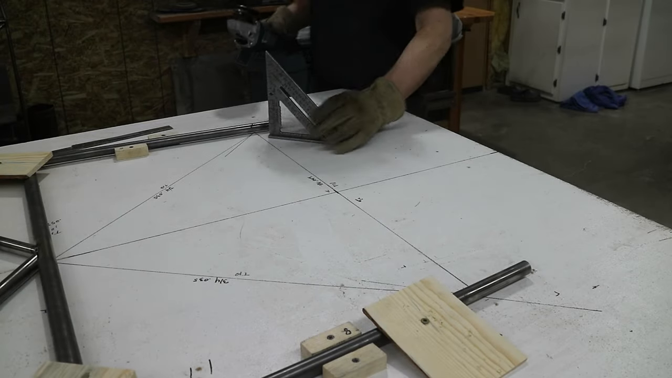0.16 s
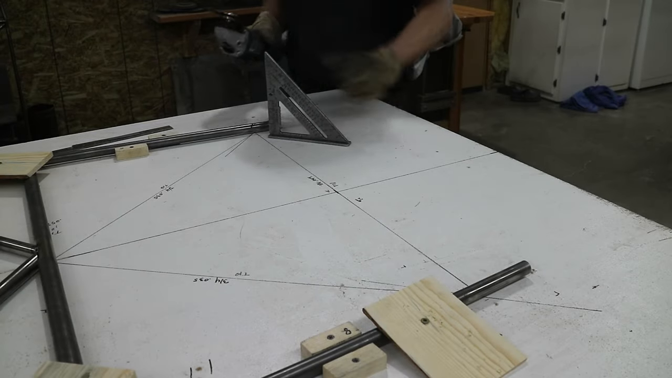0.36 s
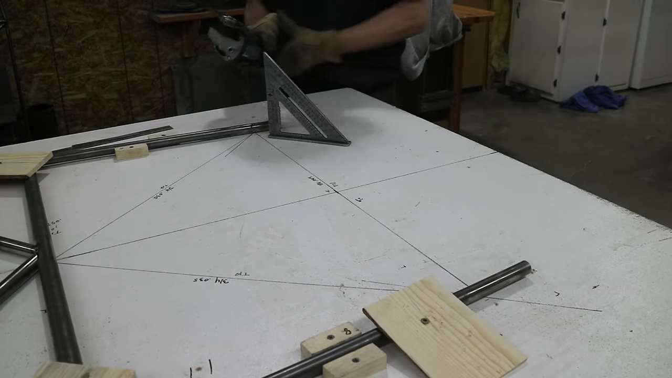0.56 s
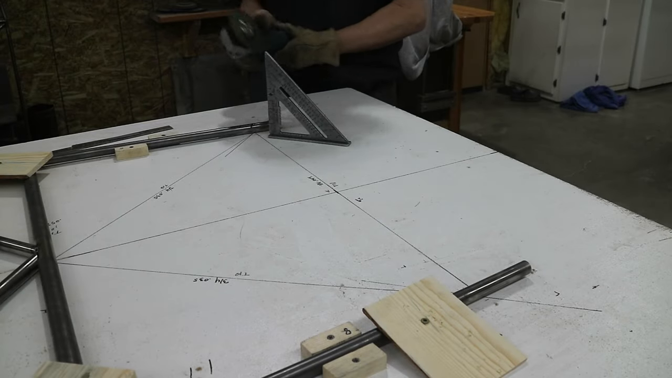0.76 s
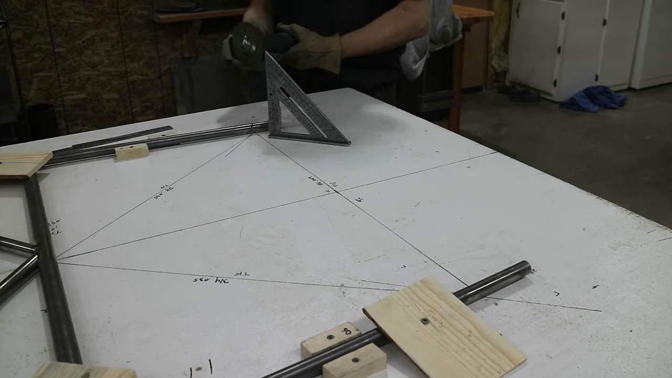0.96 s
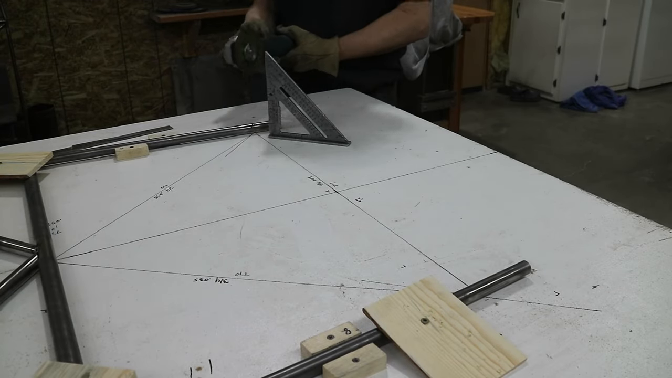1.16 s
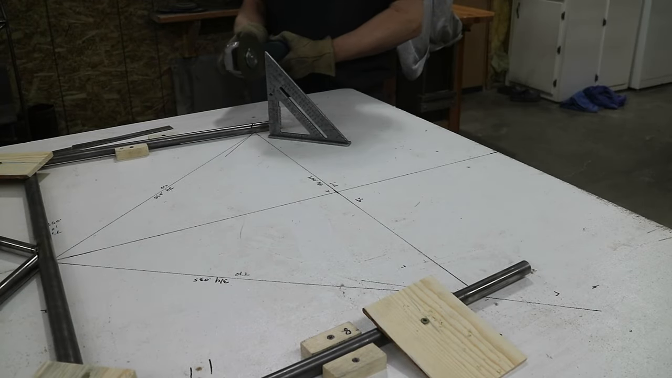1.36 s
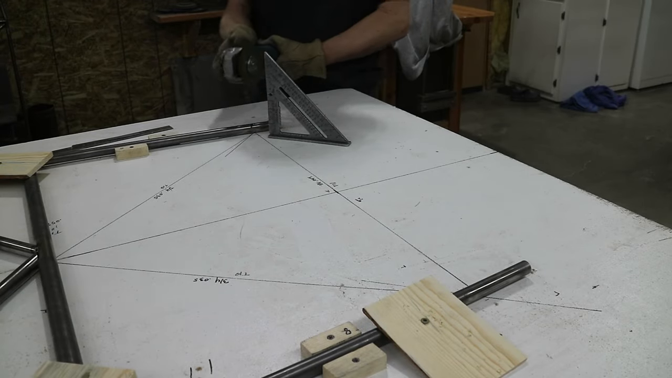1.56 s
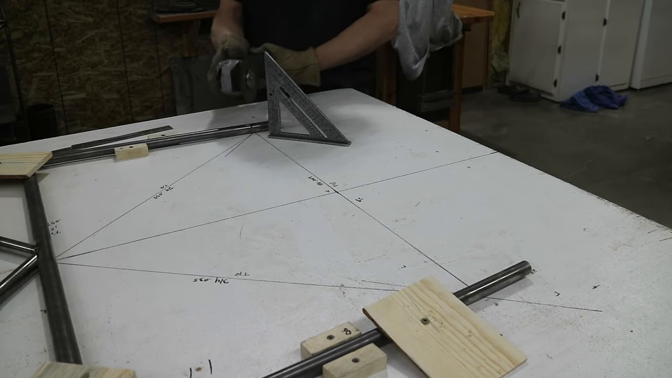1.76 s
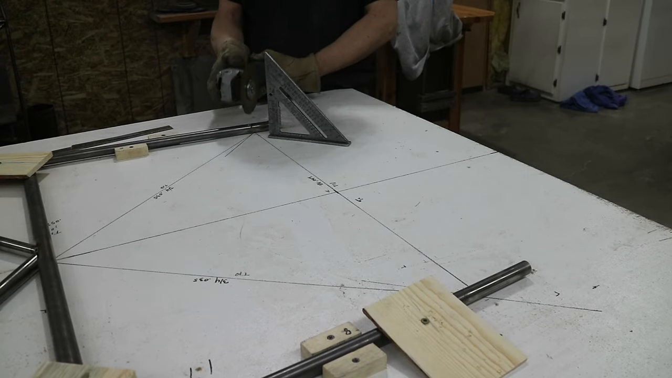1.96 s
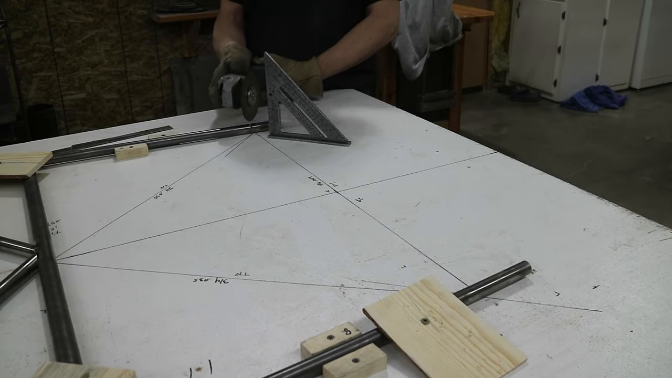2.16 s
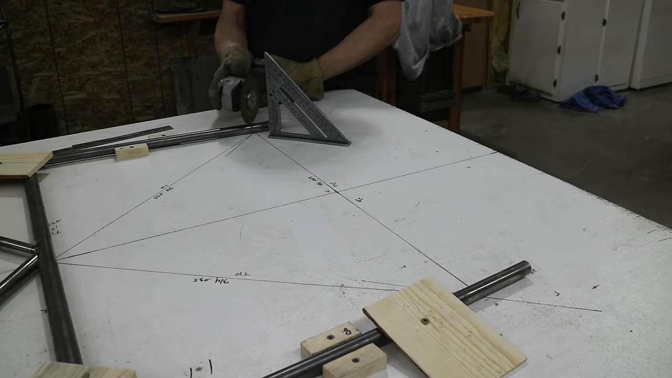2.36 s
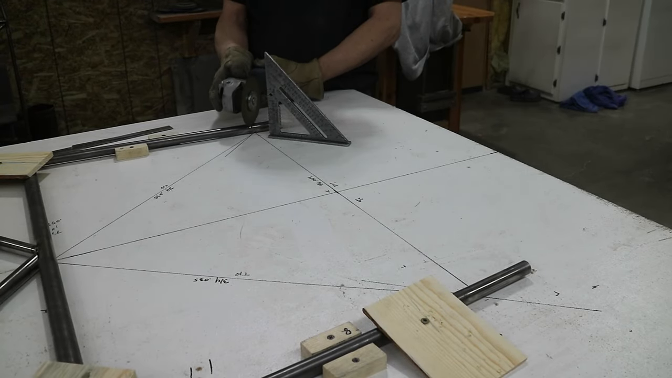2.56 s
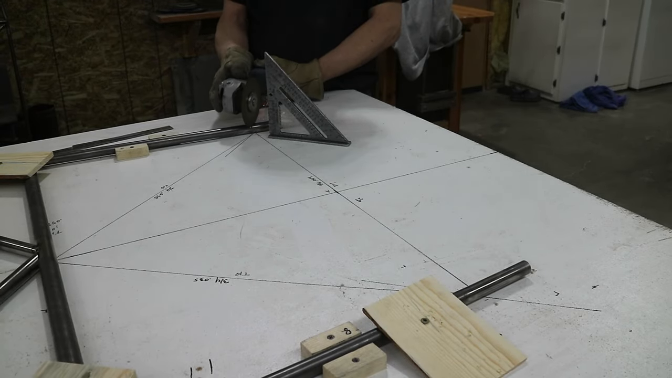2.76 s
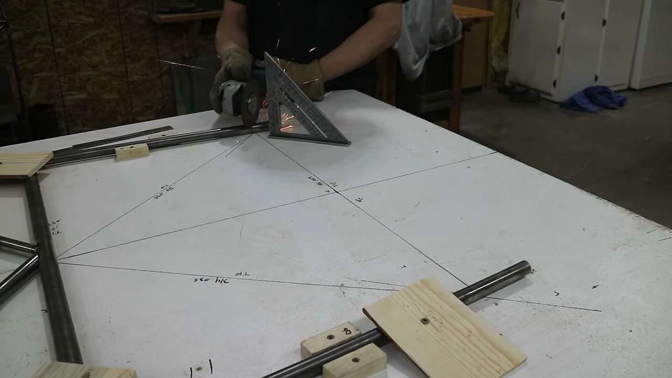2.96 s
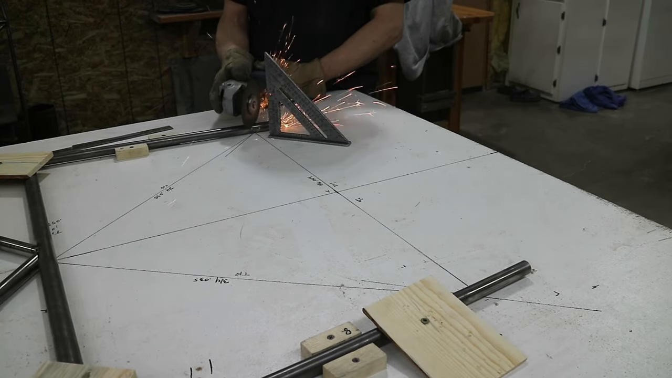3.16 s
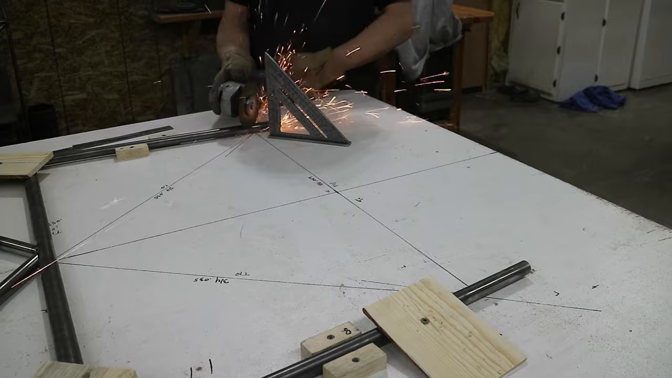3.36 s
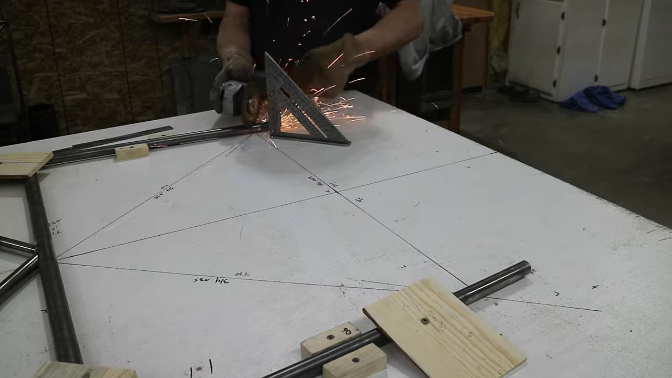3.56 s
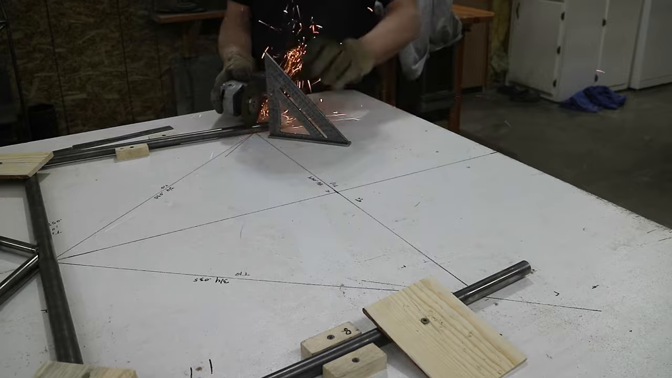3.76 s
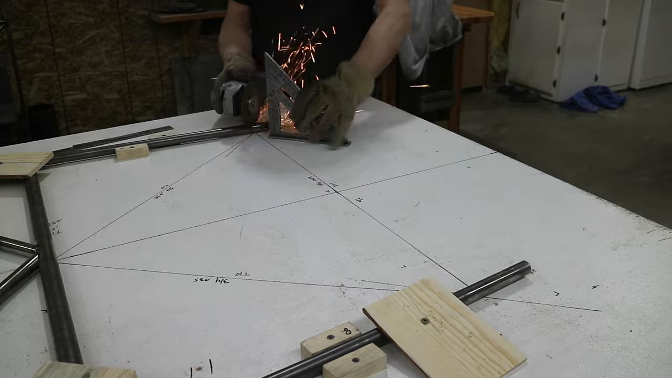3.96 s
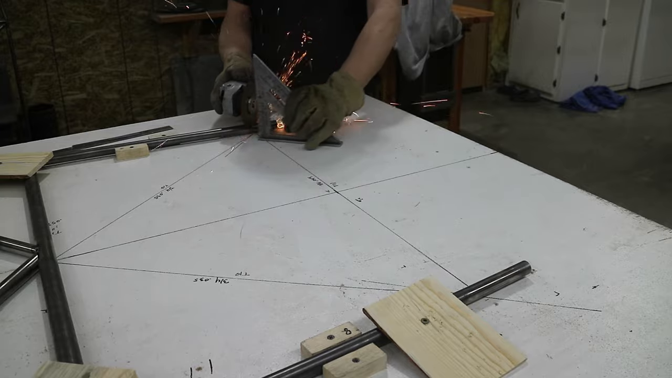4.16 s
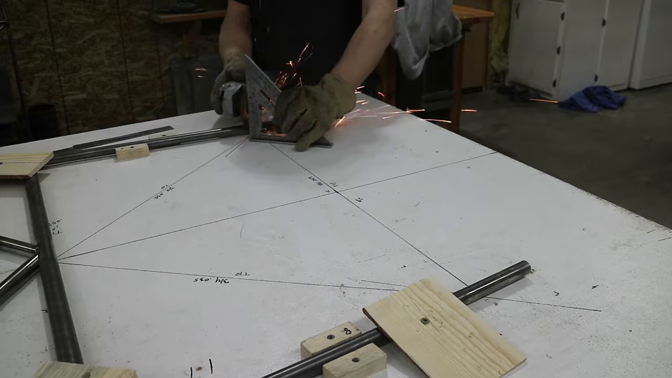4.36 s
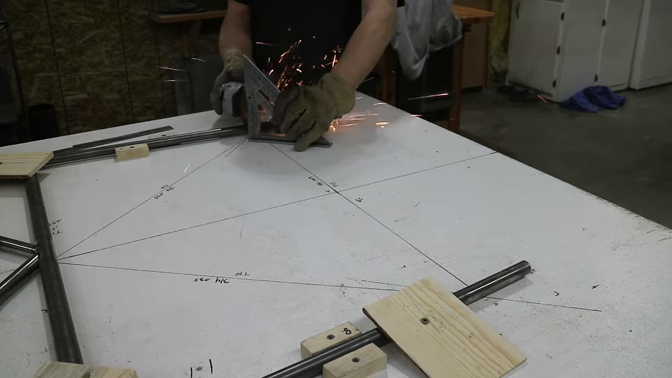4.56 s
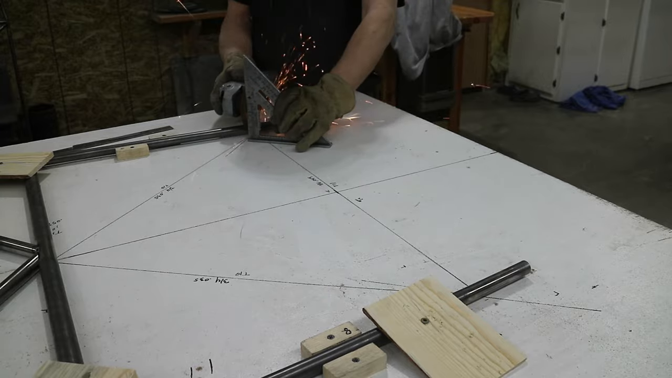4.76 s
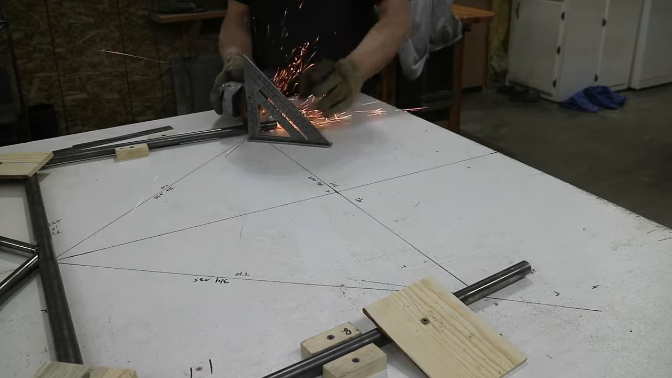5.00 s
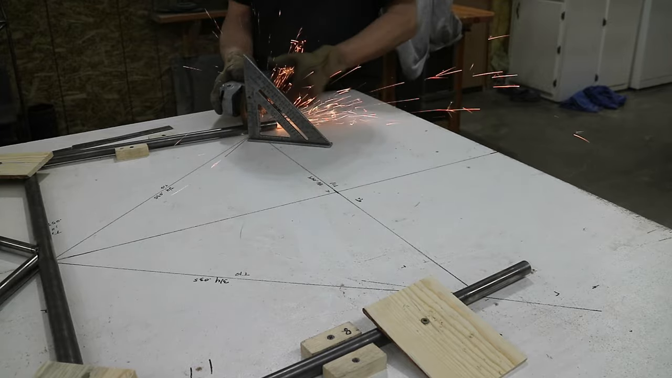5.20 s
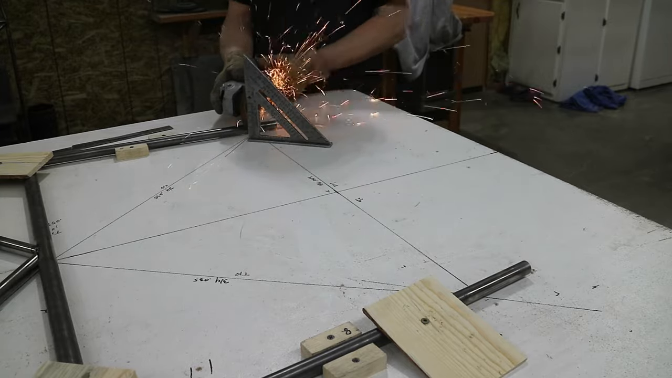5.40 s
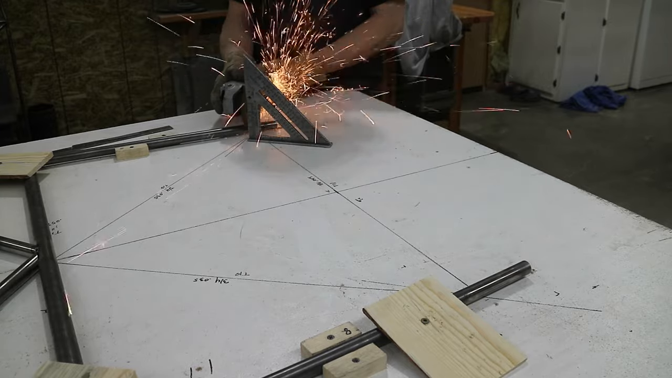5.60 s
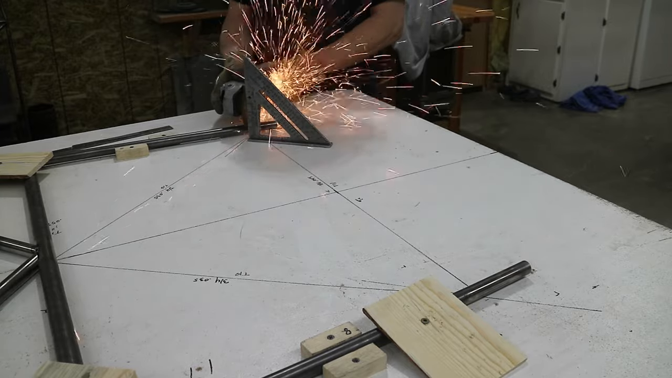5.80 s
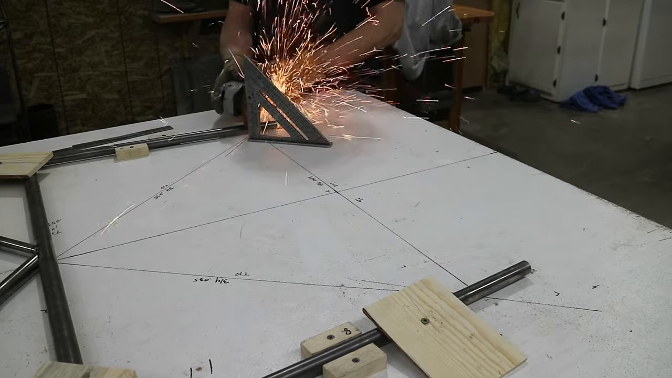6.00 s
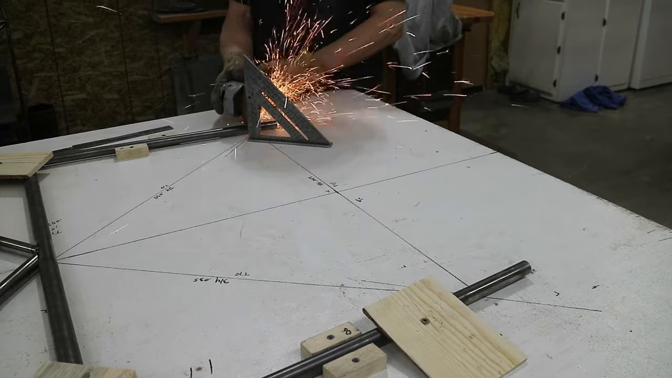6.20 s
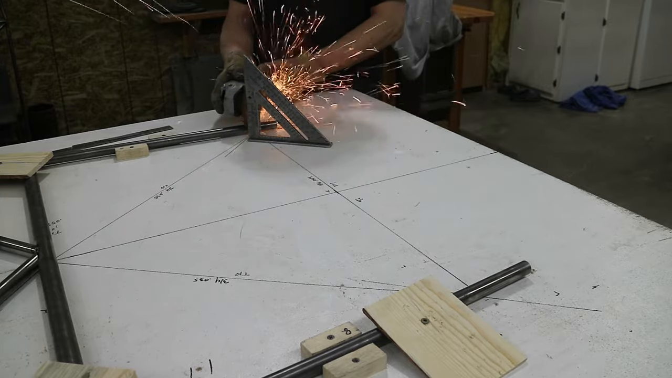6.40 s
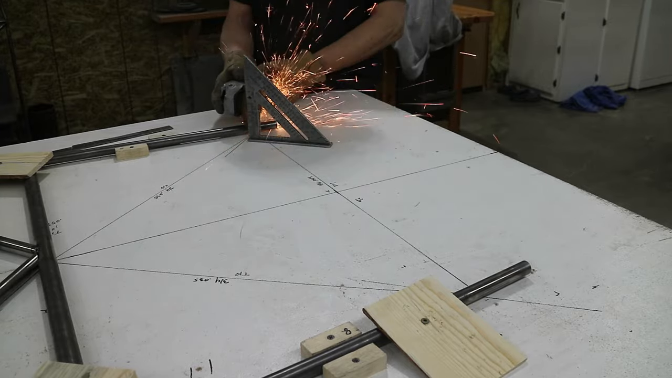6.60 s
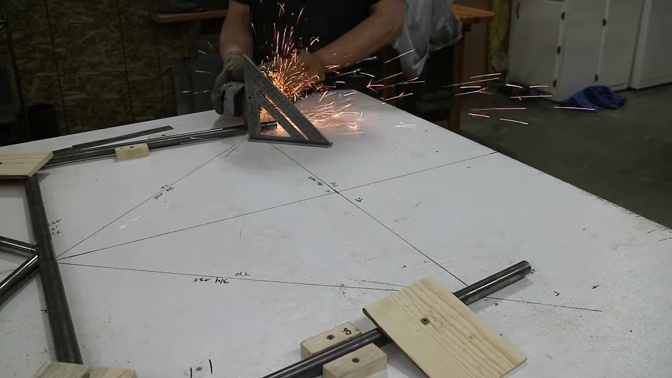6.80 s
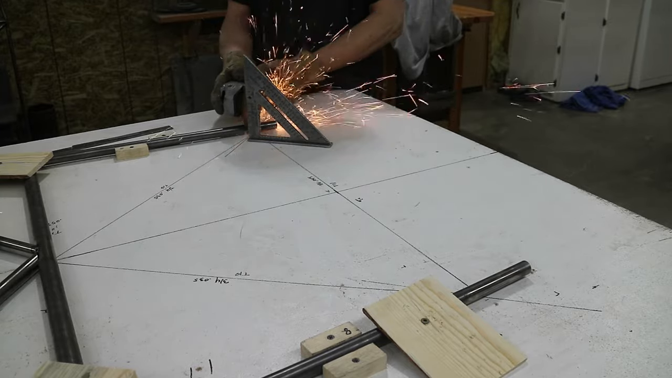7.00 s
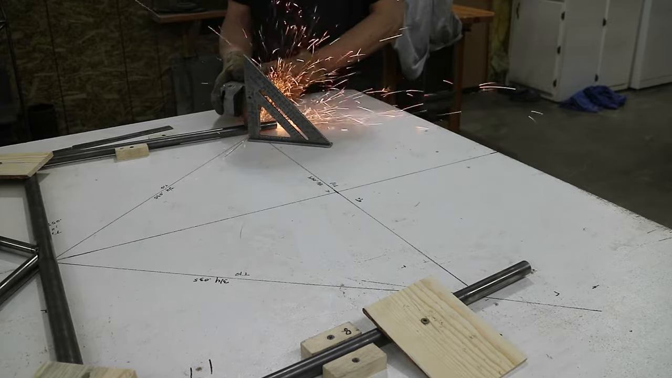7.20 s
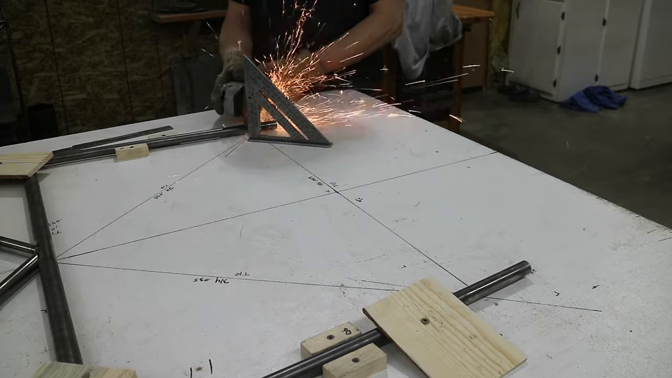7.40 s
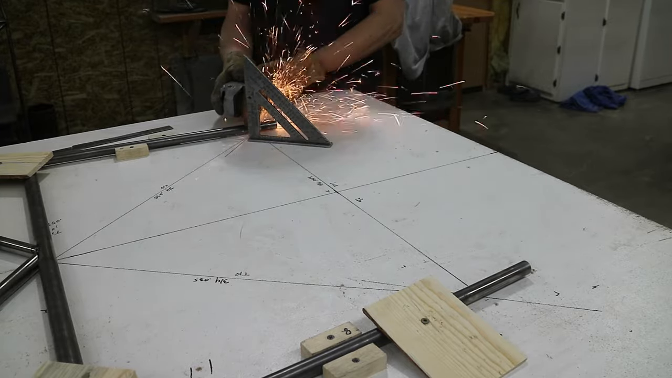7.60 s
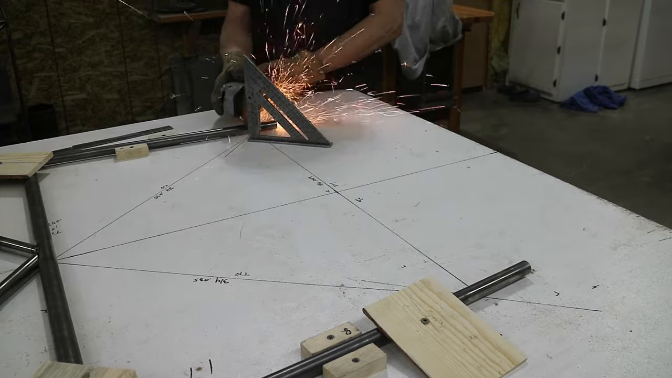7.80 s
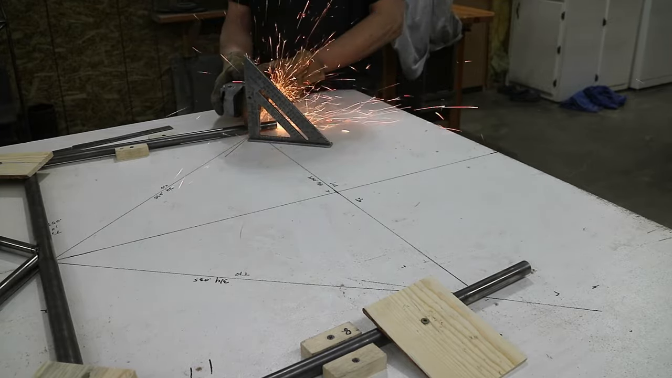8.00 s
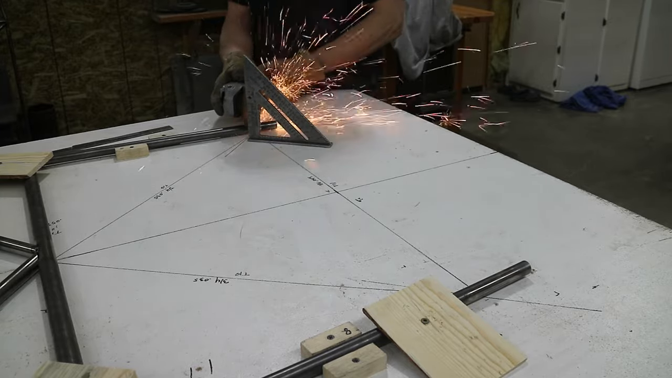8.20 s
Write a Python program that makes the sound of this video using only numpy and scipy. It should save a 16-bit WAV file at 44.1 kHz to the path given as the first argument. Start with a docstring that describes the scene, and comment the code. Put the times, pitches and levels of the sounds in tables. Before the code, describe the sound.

In a home workshop, a bench knock dies away under soft glove and sleeve rustling, with tiny tool clicks. An angle grinder jolts on, gears rattling and rotor whining upward over rushing fan air. About a second later the disc bites into steel tube: a loud, gritty, ringing scrape with bright spark hiss and shifting squeals, continuing to the end. Stereo microphone a few steps away, with slight room reverberation.

```python
"""A knock on a workshop bench dies away, gloves and sleeves brush, tools click, then an angle grinder jolts on.
Noise coloured by spectra makes bench, cloth, gear rattle and cooling air; sines make the slot whine and rotor tone.
The disc then bites into a steel tube: its uneven rim repeats a scrape every turn, so the cut sings
on multiples of the disc speed over gritty hiss that pulses with the turn and the mains."""
import sys
import numpy as np
from scipy import signal
from scipy.fft import rfft, irfft, next_fast_len
from scipy.io import wavfile
from scipy.ndimage import uniform_filter1d, map_coordinates

SR = 44100
rng = np.random.default_rng(int(sys.argv[2]) if len(sys.argv) > 2 else 0)


def materialize(psi):
    """Save the field psi as 16-bit PCM at rate SR to the path in sys.argv[1].

    A 1-D psi becomes a single channel; in a 2-D psi each row is a channel.
    """
    bounded = np.clip(np.atleast_2d(psi).T, -1, 1)
    quanta = np.round(bounded * 32767).astype(np.int16)
    wavfile.write(sys.argv[1], SR, quanta)


N = 363825
MAINS_HZ = 60
SWITCH_S, TOUCH_S = 1.443, 2.648  # motor on, disc meets steel
ROTOR_PER_DISC_TURN = 32 / 9  # gear ring teeth over pinion teeth


def amp(db):
    """Decibels to amplitude."""
    return 10 ** (np.asarray(db) / 20)


def unit(x):
    """x scaled to rms 1."""
    return x / np.sqrt(np.mean(x ** 2) + 1e-20)


def along(points, hz):
    """(Hz, value) points read on a log frequency axis."""
    f, v = np.transpose(points)
    return np.interp(np.log(hz + 1), np.log(f + 1), v)


def peaks(modes, hz):
    """Gain in dB that a body's resonances add."""
    return sum(db / (1 + (2 * (hz - centre) / width) ** 2) for centre, width, db in modes)


def curves(rows):
    """One value per sample for each column after the time."""
    s, *cols = np.transpose(rows)
    return [np.interp(np.arange(N) / SR, s, c) for c in cols]


def gate(start_s, stop_s, rise_s, fall_s):
    """0 outside start..stop, 1 inside, with straight ramps."""
    t = np.arange(N) / SR
    return np.clip((t - start_s) / rise_s, 0, 1) * np.clip((stop_s - t) / fall_s, 0, 1)


def wobble(knots_per_s):
    """A random curve, straight between Gaussian knots."""
    return np.interp(np.arange(N) * knots_per_s / SR, np.arange(N // 40), rng.standard_normal(N // 40))


def filtered(x, response):
    """x times a complex response of frequency."""
    m = next_fast_len(N + 8192)
    return irfft(rfft(x, m) * response(np.fft.rfftfreq(m, 1 / SR)), m)[..., :N]


def rush(spectrum, modes=()):
    """Two unrelated noises of one colour, rms 1."""
    m = next_fast_len(N)
    hz = np.fft.rfftfreq(m, 1 / SR)
    re, im = rng.standard_normal((2, 2, len(hz)))
    colour = amp(along(spectrum, hz) + peaks(modes, hz))
    return unit(irfft((re + 1j * im) * colour, m)[:, :N])


# Bench and cloth noise. Each row: frequency in Hz, density in dB per Hz.
BENCH_BOOM_SPECTRUM = [(45, -36), (367, -1.5), (715, -4), (1190, -6.5), (1690, -15.5), (2450, -30),
                       (4000, -55), (8800, -120)]
CLOTH_SPECTRUM = [(180, -10.5), (300, -1), (365, -9), (647, -6), (1230, -6), (1570, 3.5), (3020, -1.5),
                  (7500, -16.5), (15000, -21)]
# Cloth strokes. Each row: peak time in s, swell in s per 20 dB, fade in s per 20 dB, level in dB.
BRUSHES = [(.2, 0.28, 0.28, -57.5), (.78, 0.32, 0.35, -54.5), (1.18, 0.18, 0.26, -71),
           (1.36, 0.037, 0.42, -60)]
KNOCK_DB, KNOCK_T60_S, ROOM_DB = -35.5, 0.69, -71  # the knock dies down to the room's murmur
RUB_RE_CLOTH_DB = -11


def knock_and_cloth():
    """A struck bench decays exponentially; cloth friction hisses and rubs the bench into sound."""
    t = np.arange(N) / SR
    boom = amp(ROOM_DB) + amp(KNOCK_DB - 60 * t / KNOCK_T60_S)
    cloth = 0
    for peak_s, swell_s, fade_s, db in BRUSHES:
        cloth = cloth + amp(db - 20 * np.maximum((peak_s - t) / swell_s, (t - peak_s) / fade_s))
    bench = (boom + amp(RUB_RE_CLOTH_DB) * cloth) * rush(BENCH_BOOM_SPECTRUM)
    return bench + cloth * amp(2.3 * wobble(39.2)) * rush(CLOTH_SPECTRUM)


# Glove taps on the bench. Each row: start in s, initial envelope in dB.
THUDS = [(1.075, -57), (1.29, -64)]
THUD_HZ, THUD_T60_S = 330, .15


def glove_taps():
    """Each tap is a decaying bench tone."""
    t = np.arange(N) / SR
    out = np.zeros((2, N))
    for s, db in THUDS:
        out += amp(db - 60 * np.abs(t - s) / THUD_T60_S) * (t > s) * np.sin(2 * np.pi * THUD_HZ * (t - s))
    return out


# Small clicks of tools in the hand. Each row: start in s, relative level in dB.
TICKS = [(0.1042, -46), (0.987, -57), (1.3944, -57)]


def tool_clicks():
    """Each click is a short decaying noise puff through one broad resonance."""
    out = np.zeros((2, N))
    t = np.arange(SR // 20) / SR
    for s, db in TICKS:
        noise = rng.standard_normal((2, len(t))) * amp(-60 * t / 0.054)
        puff = filtered(noise, lambda hz: amp(peaks([(3500, 2500, 16.0)], hz) - 15))
        out[:, round(s * SR):][:, :len(t)] += amp(db + 4.0) * puff[:, :len(t)]
    return out


def hands():
    """Bench, cloth, taps and clicks, their treble rolled off around 9 kHz."""
    out = knock_and_cloth() + glove_taps() + tool_clicks()
    return filtered(out, lambda hz: 1 / (1 + (hz / 9000) ** 4))


# Disc under load. Each row: time in s, disc speed in turns per s.
LOADED_SPEED = [(2.66, 154.4), (2.92, 156.1), (3.19, 152.1), (3.47, 141.2), (3.58, 139.1), (4.11, 138.5),
                (4.42, 137.0), (5.06, 140.7), (5.18, 141.0), (5.46, 136.2), (5.67, 137.2), (6.27, 136.9),
                (6.72, 138.9), (7.25, 137.5), (8.25, 136.5)]
FREE_TURNS_PER_S, SPIN_UP_S, SPIN_POWER = 157, .35, .66


def disc_speed():
    """Turns per second: a power of an exponential run-up, then the load of the cut."""
    t = np.arange(N) / SR
    run_up = 1 - np.exp(-np.clip(t - SWITCH_S, 0, None) / SPIN_UP_S)
    free = FREE_TURNS_PER_S * run_up ** SPIN_POWER
    return np.where(t < TOUCH_S, free, curves(LOADED_SPEED)[0])


# Body jolt. Each row: frequency in Hz, density in dB per Hz.
KICK_SPECTRUM = [(300, -45), (480, -5), (1100, -6.5), (2000, -46)]
KICK_DB, KICK_T60_S = -33, 0.33


def switch_jolt():
    """The body jolts at switch-on: a decaying noise burst."""
    t = np.arange(N) / SR
    decay = amp(KICK_DB - 60 * np.abs(t - SWITCH_S) / KICK_T60_S)
    return decay * gate(SWITCH_S, 9, 0.0079, 1) * rush(KICK_SPECTRUM)


def torque_pulses():
    """Motor torque peaks twice per mains cycle."""
    t = np.arange(N) / SR
    return np.cos(2 * np.pi * (2 * MAINS_HZ * t + 0.021))


def torque_throb(torque):
    """Gain that follows the torque, deepest early in the run-up."""
    t = np.arange(N) / SR
    depth_db = 1 + 3.8 * np.exp(-np.abs(t - 1.54) / .18)
    return amp(depth_db * (torque + 1.25) + 1.2 * wobble(110))


# Gear noise. Each row: frequency in Hz, density in dB per Hz.
RATTLE_SPECTRUM = [(120, -36), (509, -18.5), (1510, -14), (2020, -3.5), (3680, -4), (4380, -10),
                   (7000, -13), (11600, -34.5), (15400, -49)]
# Gear housing resonances. Each row: centre in Hz, width in Hz, gain in dB.
HOUSING_MODES = [(600, 300, 10), (2750, 300, 6), (3700, 430, 12)]
RATTLE_DB, SLACK_S, SETTLE_DB_PER_S = -35, 0.42, 16  # level before throb, hold, then settling


def gear_rattle(throb):
    """Torque pulses shake the gears in their housing, then the gears settle."""
    t = np.arange(N) / SR
    level_db = RATTLE_DB - SETTLE_DB_PER_S * np.clip(t - SWITCH_S - SLACK_S, 0, None)
    noise = rush(RATTLE_SPECTRUM, HOUSING_MODES)
    return amp(level_db) * throb * noise * gate(SWITCH_S, 2.7, .007, .2)


# Fan noise. Each row: frequency in Hz, density in dB per Hz.
AIR_SPECTRUM = [(25, -38), (262, -23.5), (454, -15), (531, -5.5), (590, -15.5), (1100, -1), (2900, -11),
                (5290, -7.5), (10400, -22), (15400, -41)]
# Air outlet resonances. Each row: centre in Hz, width in Hz, gain in dB.
VENT_MODES = [(2250, 370, 6.5), (3760, 210, 7)]
AIR_DB, AIR_POWER = -28, 0.11  # level at free speed, growth as a power of speed


def cooling_air(speed, torque):
    """The fan blows through the vents; it swells with speed, pulses with torque and fades into the cut."""
    level = speed ** AIR_POWER * amp(AIR_DB + 0.91 * torque)
    return level * rush(AIR_SPECTRUM, VENT_MODES) * gate(SWITCH_S, 3.194, 1.09, 0.7)


SLOTS_PER_ROTOR_TURN = 10


def slot_whine(rotor_turns, throb):
    """Armature slots sing at slot rate and its octave only while the starting current is high."""
    phase = 2 * np.pi * SLOTS_PER_ROTOR_TURN * rotor_turns + 1.1 * np.array([wobble(250), wobble(250)])
    first = gate(1.512, 1.76, .012, .24) * np.sin(phase)
    octave = gate(1.47, 1.53, .04, .015) * np.sin(2 * phase)  # leads
    return throb * amp(-35) * (first + octave)


# Motor shell resonances the rotor passes. Each row: centre in Hz, width in Hz, gain in dB.
SHELL_MODES = [(499, 57, 14), (544.5, 13, 10)]
UNBALANCE_DB, UNBALANCE_POWER = -49, 2.54  # level at free speed before shell gain, growth with speed
SHELL_DAMPING_S = 0.31  # the cut damps the shell with this time constant
SLOWING_DB = .18  # drop per turn per s squared of braking


def rotor_tone(speed, rotor_turns):
    """An unbalanced rotor rings the shell as it runs up; the tone sinks while load brakes the disc."""
    t = np.arange(N) / SR
    shell_free = np.exp(-np.clip(t - TOUCH_S, 0, None) / SHELL_DAMPING_S)
    rotor_hz = ROTOR_PER_DISC_TURN * FREE_TURNS_PER_S * speed
    unbalance = speed ** UNBALANCE_POWER * amp(UNBALANCE_DB + shell_free * peaks(SHELL_MODES, rotor_hz))
    acceleration = uniform_filter1d(np.gradient(disc_speed()) * SR, size=4000)
    slowing = np.clip(-acceleration, 0, None)
    level = unbalance * amp(-SLOWING_DB * slowing) * amp(1.8 * wobble(8.8))
    tone = level * np.sin(2 * np.pi * rotor_turns + 1.2 * wobble(9))
    return tone * [[1], [.3]]  # direct, reflected


def motor():
    """Jolt, throbbing gears, fan, slot whine and rotor tone share one motor speed."""
    rotor_turns = ROTOR_PER_DISC_TURN * np.cumsum(disc_speed()) / SR
    speed = disc_speed() / FREE_TURNS_PER_S
    torque = torque_pulses()
    throb = torque_throb(torque)
    driven = switch_jolt() + gear_rattle(throb) + cooling_air(speed, torque)
    return driven + slot_whine(rotor_turns, throb) + rotor_tone(speed, rotor_turns)


# Steel tube resonances. Each row: centre in Hz, width in Hz, gain in dB.
TUBE_MODES = [(3520, 220, 3.5), (4487, 45, 5), (5650, 150, 7), (6790, 470, 6), (8725, 360, 10.5),
              (10490, 580, 7), (11360, 590, 8)]
# Grit and spark hiss. Each row: frequency in Hz, density in dB per Hz.
GRIT_SPECTRUM = [(25, -56), (333, -18), (484, -14), (688, -8), (1490, -2.5), (1750, -3), (4570, -2.5),
                 (8000, -16.5), (10400, -82), (17600, -120)]
SPARK_SPECTRUM = [(4120, -22), (7000, 0.5), (8130, -2.5), (8890, -1), (11200, 1.5), (15400, -12.5)]
SPARK_DB, SPARK_DB_PER_STEADINESS = -2.5, -11  # spark hiss weakens as the disc steadies


def grit_and_sparks(turns, press_db, steadiness):
    """Grit tears the steel: grainy hiss pulses with each disc turn and twice per mains cycle."""
    t = np.arange(N) / SR
    spark_db = SPARK_DB + SPARK_DB_PER_STEADINESS * steadiness
    pulse_db = 1.5 * np.cos(2 * np.pi * turns) + 0.48 * np.cos(4 * np.pi * turns + 1.2)
    pulse_db += .5 * np.cos(4 * np.pi * MAINS_HZ * t)
    grains_db = 2.44 * wobble(900)
    grit_db = press_db - 2.5 + 0.77 * pulse_db + grains_db + 0.27 * wobble(9.6)
    sparks_db = press_db + spark_db + 2.0 + pulse_db + grains_db + 0.9 * wobble(12)
    return amp(grit_db) * rush(GRIT_SPECTRUM, TUBE_MODES) + amp(sparks_db) * rush(SPARK_SPECTRUM, TUBE_MODES)


# Bench drone. Each row: frequency in Hz, density in dB per Hz.
DRONE_SPECTRUM = [(30, -8), (75, -14), (100, 6), (125, -18), (400, -120)]


def bench_drone(steadiness):
    """Low bench noise is stronger the more firmly the disc is held."""
    return amp(-86.5 + 17.0 * steadiness + 1.9 * wobble(3.5)) * rush(DRONE_SPECTRUM)


# Rotor shaking the disc. Each row: disc-turn multiple added to rotor speed, mean level in dB at steadiness 1.
BEATS = [(3, -55), (7, -48.5), (8, -59)]


def rotor_beats(turns):
    """The rotor shakes the disc: tones at rotor speed plus multiples of the turn."""
    out = 0
    for k, db in BEATS:
        phase = 2 * np.pi * (ROTOR_PER_DISC_TURN + k) * turns + wobble(8)
        out = out + amp(db + 3.0 * wobble(6)) * np.sin(phase)
    return out


# Rim scrape. Each row: frequency in Hz, relative level in dB.
RIM_SPECTRUM = [(150, -52), (250, -21.5), (395, -10), (973, -1), (1970, -5.5), (2550, -4), (4530, -0.5),
                (7780, -12), (12500, -11.5), (16200, -21.5)]
# Lasting rim bumps, stronger while the disc is steady. Each row: multiple of the turn, relative level in dB.
HELD_MULTIPLES = [(2, -65.5), (3, -58), (4, -58), (5, -57.5), (6, -54), (7, -55.5), (8, -58), (9, -57),
                  (10, -55.5), (11, -49.5), (12, -53.5), (16, -53)]
# Multiples that sing out. Each row: start in s, length in s, multiple of the turn, relative level in dB.
SQUEALS = [(2.65, .65, 57, -41.5), (2.67, 0.57, 29, -39), (2.7, .33, 28, -42), (2.67, 0.6, 36, -43.5),
           (2.749, 0.46, 25, -42), (2.875, 0.1, 17, -37), (2.848, .42, 37, -39.5), (2.85, 0.57, 26, -44),
           (3.0, 0.23, 35, -38.5), (3.194, 0.27, 10, -45), (3.38, .27, 20, -40), (3.34, 0.27, 14, -40.5),
           (3.496, 0.91, 63, -39), (3.5, 1.3, 11, -46.5), (3.63, 0.68, 33, -40), (3.633, 0.63, 32, -37),
           (3.636, 0.55, 9, -47), (3.7, 0.4, 14, -45), (3.8, 0.31, 20, -46), (3.85, .8, 23, -45),
           (4.435, 0.34, 9, -46.5), (4.43, 0.65, 26, -41), (4.448, 0.62, 32, -41.5),
           (4.622, 0.55, 19, -44.5), (4.65, .75, 6, -52.5), (4.85, .4, 25, -45), (4.87, .38, 10, -45),
           (5.098, 0.28, 14, -40.5), (5.19, 0.36, 26, -39.5), (5.397, 1.2, 3, -52.5), (5.42, 0.18, 11, -37),
           (5.45, 1.24, 32, -41.5), (5.5, 0.44, 14, -41), (5.54, 1.06, 5, -49.5), (5.6, .55, 26, -41.5),
           (5.8, 0.6, 31, -42.5), (5.823, 0.74, 12, -44), (5.85, 2.3, 19, -40.5), (6.05, 1.65, 14, -39.5),
           (6.155, 0.38, 26, -38.5), (6.59, 0.079, 26, -30), (6.78, 0.14, 26, -33.5),
           (6.98, 0.74, 5, -49.5), (6.997, 0.98, 28, -37), (7.0, 0.44, 6, -50), (7.05, .65, 25, -39),
           (7.1, 0.47, 26, -39), (7.35, 0.68, 3, -52.5), (7.4, 1.1, 27, -40.5), (7.45, 0.56, 11, -44.5),
           (7.7, .63, 14, -45), (7.79, .5, 23, -42), (8.024, .3, 20, -34)]
SQUEAL_STEADY = 0.57  # share of drift removed from a squeal at disc steadiness 1
SQUEAL_APART_DB = -4.5  # a squeal arrives mostly direct


def rim(turns, press_db, steadiness, wear_db, flicker_db, drift, size=640):
    """The scrape of one turn as disc-speed multiples; the rim wears, so each swells, flickers and drifts."""
    count, orders = int(turns[-1]) + 2, np.arange(size // 6)
    at = np.minimum(np.searchsorted(turns, np.arange(count)), N - 1)  # first sample of each turn
    turn_s = at / SR
    hz, loose = disc_speed()[at, None] * orders, 1 - steadiness[at, None]

    def slow(span):
        """Noise per channel, turn and multiple, smoothed twice over span turns, rms 1."""
        noise = rng.standard_normal((2, count, len(orders)))
        once = uniform_filter1d(noise, span, 1)
        return unit(uniform_filter1d(once, span, 1))

    fine = np.clip(hz / 1800, .2, 1)  # coarse bumps last longer than fine ones
    level = amp(along(RIM_SPECTRUM, hz) + wear_db * fine * np.minimum(slow(30), .5))
    level *= amp(press_db[at, None]) / np.sqrt(np.mean(np.sum(level ** 2, -1)) / 2)
    # a loose disc skates: the tube rings freely and the low multiples are weak
    tube_db = peaks(TUBE_MODES, hz) * (.5 + 1.4 * loose)
    level *= amp(tube_db - loose * (6.0 + 2.0 * np.clip(1 - hz / 4000, 0, 1)))
    held_db = 1.8 * slow(40) - loose ** 2 * (22 + 16 * (1 - fine))
    for order, db in HELD_MULTIPLES:
        k = round(order)
        level[:, :, k] = amp(db + 5 + held_db[:, :, k])

    unsteady = fine * (.2 + 2.1 * loose)
    wavers = unsteady * slow(5) + slow(12) * fine * .5
    for s, length_s, order, db in SQUEALS:
        k = round(order)
        share = np.clip(np.minimum(turn_s - s, s + length_s - turn_s) / .05 + .5, 0, 1)
        squeal = amp([[db + 3], [db + 2 + SQUEAL_APART_DB]])  # direct, reflected
        level[:, :, k] += share * (squeal - level[:, :, k])
        unsteady[:, k] *= 1 - SQUEAL_STEADY * share * steadiness[at]
        wavers[:, :, k] *= 1 - 0.33 * share

    phase = rng.uniform(0, 2 * np.pi, (2, 1, len(orders)))
    phase = phase + drift * unsteady * (1 + hz / 9000) * slow(9)
    phase += 2.3 * loose ** 2 * fine * slow(3)  # a loose disc chatters and smears every multiple
    shape = irfft(level * amp(flicker_db * wavers) * np.exp(1j * phase), size) * size / 2
    shape = np.concatenate([shape, shape[..., :1]], -1)  # close the circle
    # read round the rim, blending each turn into the next
    return np.array([map_coordinates(s, [turns, turns % 1 * size], order=1) for s in shape])


def workshop(pair, t60_s, wet_db):
    """Walls add a decaying tail, so gliding tones flicker through the room's modes."""
    t = np.arange(SR // 2) / SR
    tail = rng.standard_normal((2, len(t))) * amp(-60 * t / t60_s)
    tail /= np.linalg.norm(tail[0])
    return pair + amp(wet_db) * signal.fftconvolve(pair, tail, axes=1)[:, :N]


# Disc steadiness. Each row: time in s, how firmly the disc is held from 0 to 1.
DISC_STEADINESS = [(2.65, 0.62), (3.3, 0.42), (3.65, 0.61), (5.2, 0.67), (5.6, 0.81), (8.25, 0.73)]
PRESS_DB = -32.5  # mean pressing level before each layer's offset


def cut():
    """Pressing drives hiss and singing rim together; rim and beats also ring in the workshop."""
    turns = np.cumsum(disc_speed()) / SR
    press_db, steadiness = PRESS_DB + wobble(9), np.clip(curves(DISC_STEADINESS)[0], 0, 1)
    hiss_and_drone = grit_and_sparks(turns, press_db, steadiness) + bench_drone(steadiness)
    song = rim(turns, press_db - 0.5, steadiness, wear_db=6.0, flicker_db=3.5, drift=0.73)
    beats = steadiness * rotor_beats(turns) * [[1], [.3]]  # direct, reflected
    touch = gate(TOUCH_S, 9, 0.0064, .1)
    return hiss_and_drone * touch + workshop((song + beats) * touch, t60_s=0.73, wet_db=-10.5)


# Stereo width. Each row: frequency in Hz, left-right likeness from 0 to 1.
LIKENESS = [(100, .94), (700, .92), (1600, .93), (2600, .42), (14000, .4)]


def ports(pair, lead_samples):
    """Both ports share the direct sound and differ in the reflected part; the left one hears it early."""
    m = next_fast_len(N + 256)
    hz = np.fft.rfftfreq(m, 1 / SR)
    turn = np.arccos(np.clip(along(LIKENESS, hz), -1, 1)) / 2
    same, apart = rfft(pair, m) * [np.cos(turn), np.sin(turn)]
    early = np.exp(1j * np.pi * hz * lead_samples / SR)  # half the lead on each side
    return irfft(np.array([(same + apart) * early, (same - apart) / early]), m)[:, :N]


# Worker position. Each row: time in s, left minus right in dB.
PAN = [(0, 2), (2.2, 1.2), (3.7, -1), (6.6, -.7), (7.6, .5), (8.25, -1)]


def scene():
    """All sources at the two ports, panned as the worker moves."""
    pan_db = curves(PAN)[0] * [[.5], [-.5]]
    return ports(hands() + motor() + cut(), lead_samples=1.58) * amp(pan_db)


TOP_HZ = 15500


def record(dry):
    """A sharp band limit removes everything from TOP_HZ up."""
    return filtered(dry, lambda hz: hz < TOP_HZ)


dry = scene()
out = record(dry)
materialize(out)
```